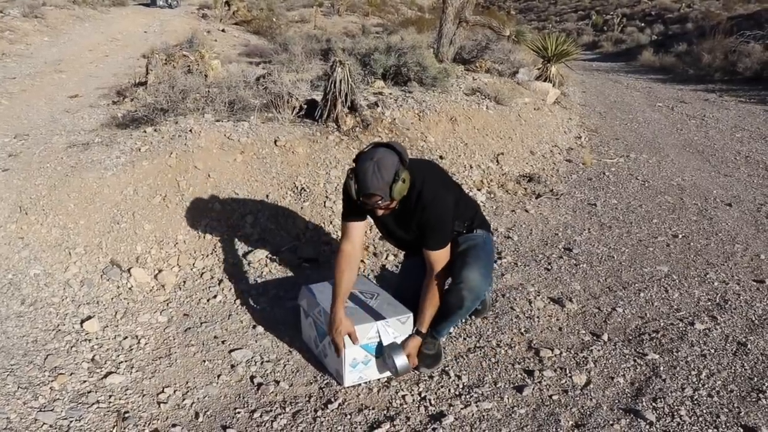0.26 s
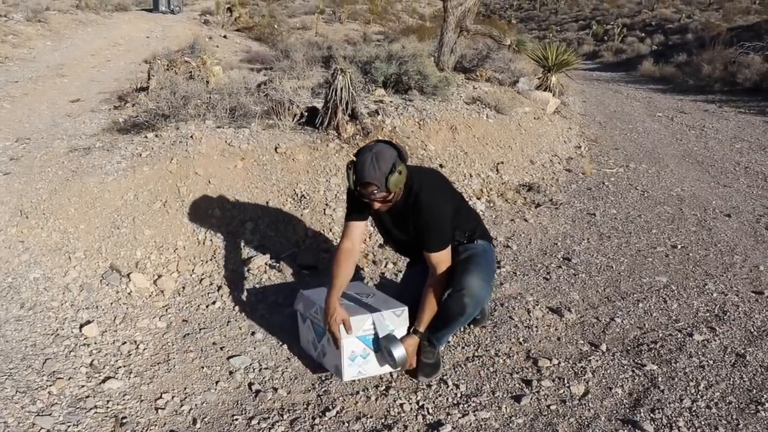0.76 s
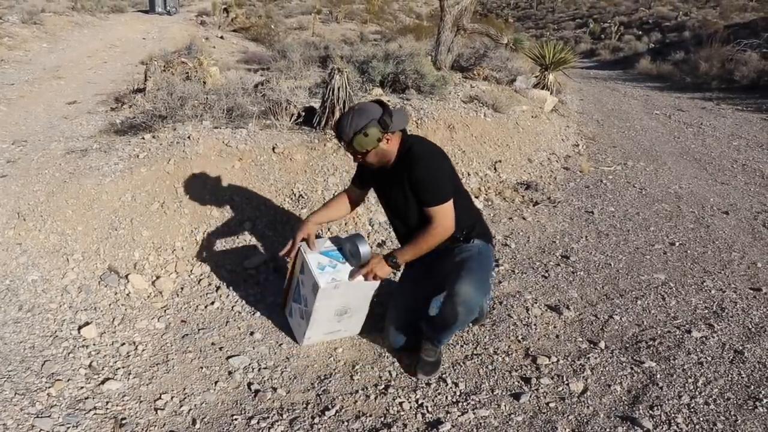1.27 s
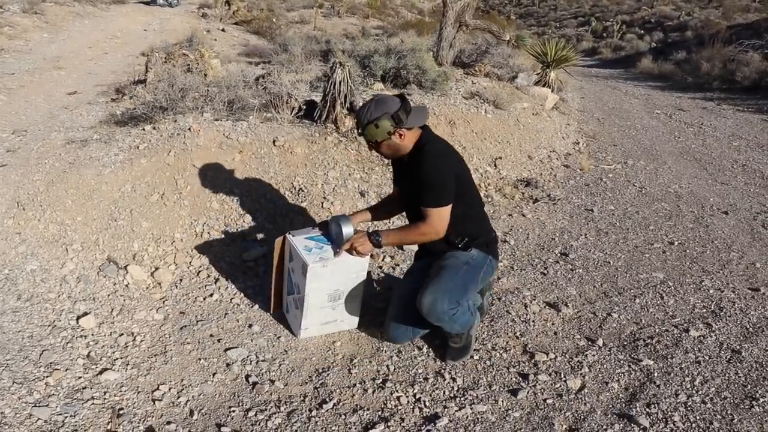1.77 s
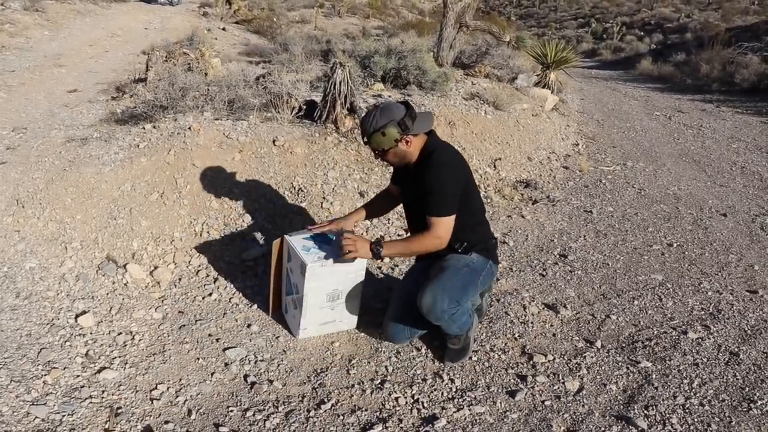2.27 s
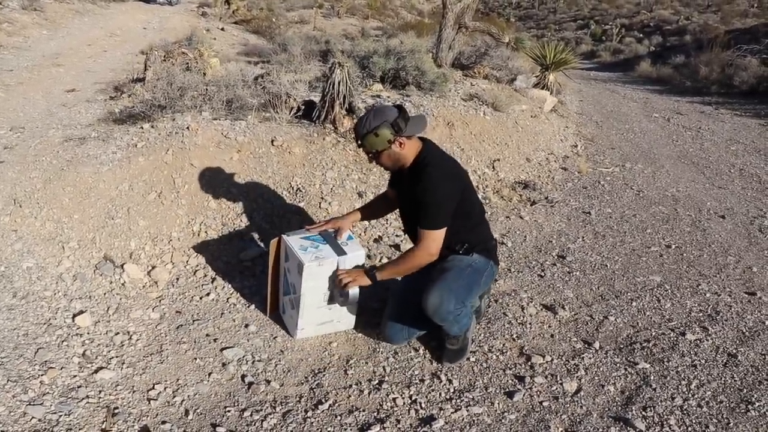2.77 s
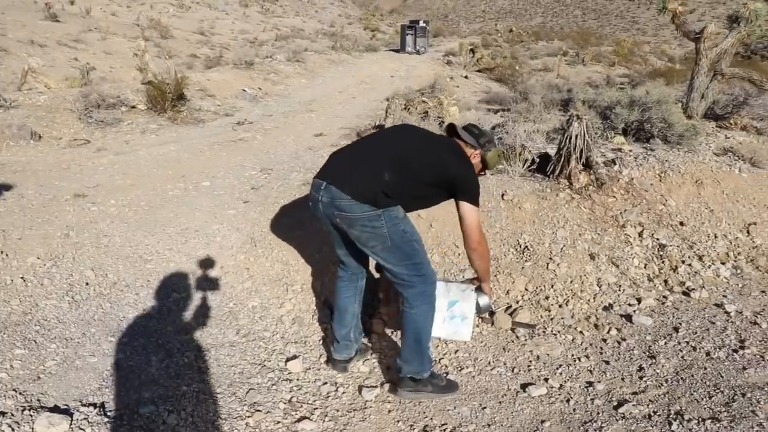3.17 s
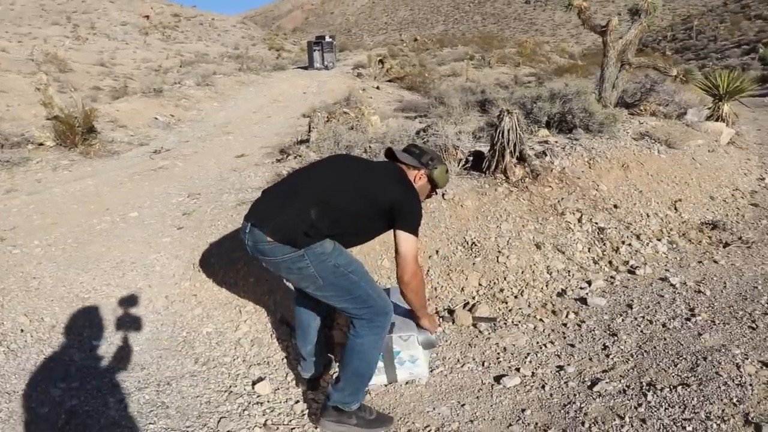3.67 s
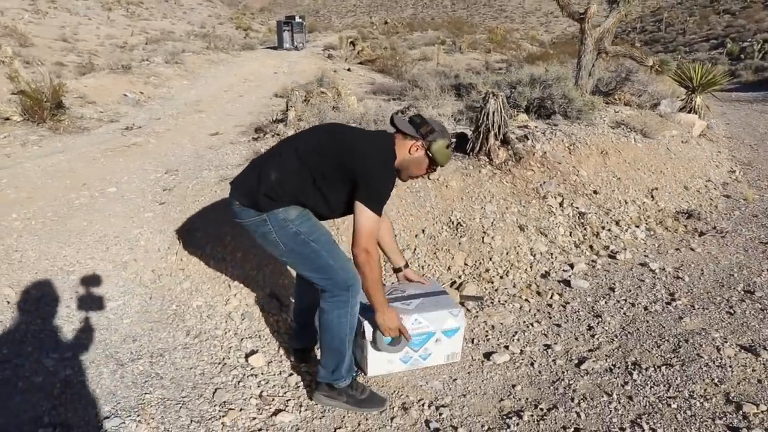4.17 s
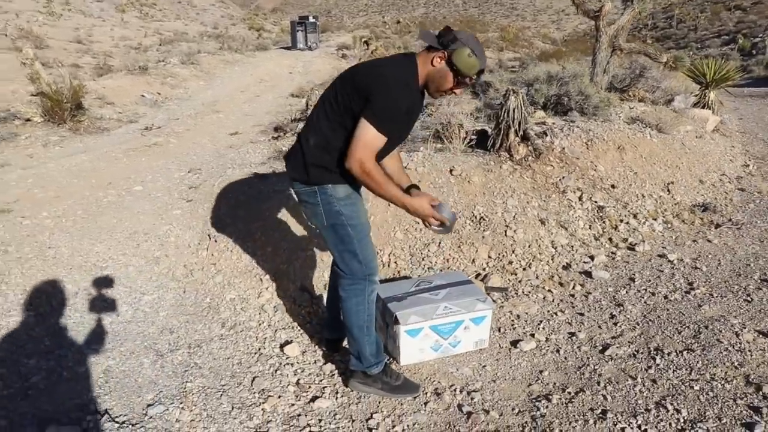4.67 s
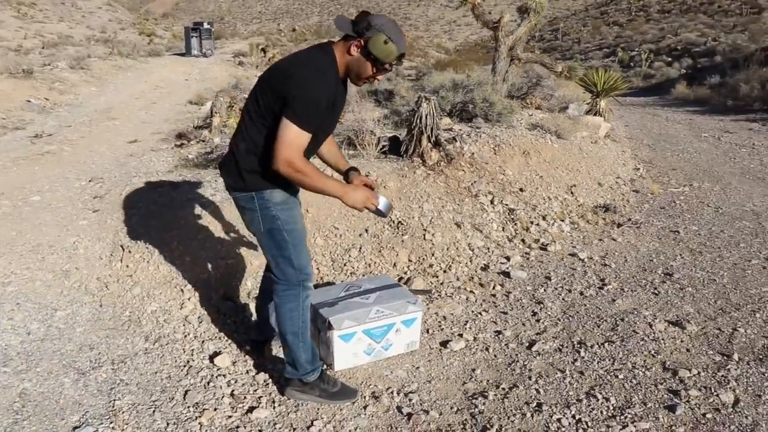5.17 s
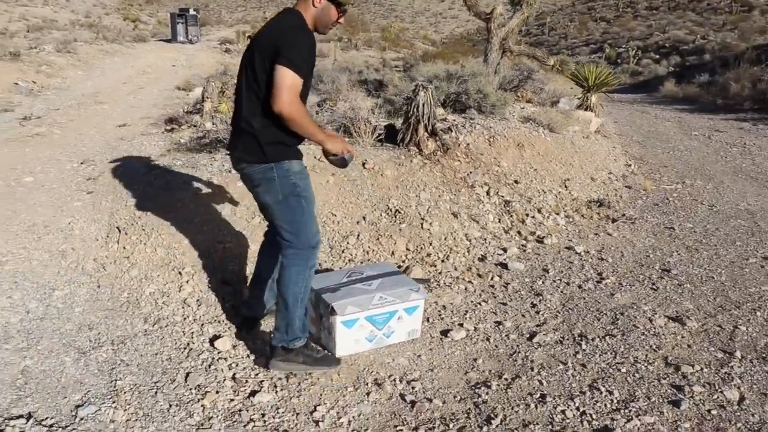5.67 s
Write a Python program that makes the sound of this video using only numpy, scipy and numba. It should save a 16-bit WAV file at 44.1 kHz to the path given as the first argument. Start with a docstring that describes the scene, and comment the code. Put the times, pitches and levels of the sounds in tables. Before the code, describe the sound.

Outdoors on open gravel, a camera microphone a few metres away catches low wind rumble and thumps over faint hiss and small cracks. Packing tape then tears off its roll in short, rasping rips against a cardboard box. The box and boots grind loudly over stones, then things quieten to scattered clicks and light crunches. Dry, mono, no echo.

```python
"""A cardboard box is wrapped in duct tape on desert gravel, a few metres from a mono camera microphone.
Rumbling gusts and thumps on the microphone open it, over air hiss, cracks and grinding grit that run on
throughout; a soft airy hiss swells briefly near 0.6 s. From 1.4 to 3.5 s tape peels off the roll in five
stick-slip rips, clicks ringing the taut tape, roll and box. Around 3.3 to 4.2 s the box and boots grind
hardest, as showers of ringing grains; then the ground quietens, with damped-sine cracks to the end."""
import sys
import numpy as np
from scipy import signal
from scipy.fft import rfft, irfft
from scipy.io import wavfile
from scipy.ndimage import uniform_filter1d
from numba import njit

SR = 44100
rng = np.random.default_rng(int(sys.argv[2]) if len(sys.argv) > 2 else 0)


def materialize(psi):
    """Save the field psi as 16-bit PCM at rate SR to the path in sys.argv[1].

    A 1-D psi becomes a single channel; in a 2-D psi each row is a channel.
    """
    bounded = np.clip(np.atleast_2d(psi).T, -1, 1)
    quanta = np.round(bounded * 32767).astype(np.int16)
    wavfile.write(sys.argv[1], SR, quanta)


N = 261072  # length in samples


def undb(db):
    """Amplitude factor of a level in dB."""
    return 10 ** (np.asarray(db) / 20)


def unit(x):
    """Scale to an RMS of 1."""
    return x / np.sqrt(np.mean(x ** 2))


def noise(n=N):
    """White noise."""
    return rng.standard_normal(n)


def curves(table):
    """Columns of a table after its time column, interpolated to one value a sample."""
    s, *columns = np.transpose(table)
    return [np.interp(np.arange(N) / SR, s, c) for c in columns]


@njit
def svf(x, hz, width):
    """State-variable band-pass, gain 1 at a centre that may move."""
    y, b, l = np.empty(len(x)), 0., 0.
    for i in range(len(x)):
        g, k = np.tan(np.pi * hz[i] / SR), width / hz[i]
        v = (b + g * (x[i] - l)) / (1 + g * (g + k))
        b, l, y[i] = 2 * v - b, l + 2 * g * v, k * v
    return y


def band(x, hz, width):
    """Band-pass with a fixed centre and width in Hz."""
    return svf(x, np.full(len(x), 1. * hz), 1. * width)


def high(x, hz):
    """Third-order high-pass."""
    return signal.sosfilt(signal.butter(3, hz, "high", fs=SR, output="sos"), x)


@njit
def rings(n, at, hz, t60, size):
    """Damped sines, each started at its own moment and stopped 60 dB down."""
    y = np.zeros(n)
    for e in range(len(at)):
        turn = np.exp(2j * np.pi * hz[e] / SR - np.log(1000) / (t60[e] * SR))
        z = size[e] + 0j
        for i in range(int(at[e] * SR), min(n, int((at[e] + t60[e]) * SR))):
            y[i] += z.imag
            z *= turn
    return y


def walk(rate):
    """Random levels held 1 / rate s and slewed twice; spread 1."""
    k = int(SR / rate)
    steps = np.repeat(noise(N // k + 1), k)
    return unit(uniform_filter1d(uniform_filter1d(steps, k), k)[:N])


@njit
def slips(rate, uneven, chance):
    """The glue holds, then lets go: one click a cycle, each cycle with its own length and size."""
    y, phase, k = np.zeros(len(rate)), 1., 0
    for i in range(len(rate)):
        phase += rate[i] * np.exp(2 * uneven[i] ** 2 * chance[k, 0]) / SR
        if phase >= 1:
            phase, k = phase - 1, k + 1
            y[i] = np.exp(uneven[i] * chance[k, 1]) * np.sqrt(SR / rate[i])
    return y


def rips():
    """Slips ring the taut tape, the roll and the box; each slip tears for about a millisecond."""
    # tape pulled off the roll, one row a rip: (glue hiss over the roll at the start [dB],
    # box over the roll at the start [dB], unevenness at the start [0-1], course of the pull:
    # (time [s], taut tape level [dB], roll level [dB], taut tape pitch [Hz], typical slip rate [1/s]))
    pulls = [ (-8.5, -11, 0.44, [(1.388, -36, -40, 955, 700), (1.404, -24, -31.5, 870, 960),
             (1.45, -30.5, -30.5, 900, 900), (1.47, -30, -31, 780, 740), (1.514, -32, -33.5, 790, 740),
             (1.555, -52, -48, 960, 760)]), (-23, -17, .13, [(2.087, -11.5, -17.5, 720, 119),
             (2.1, -8, -23.5, 727, 141), (2.122, -14, -26.5, 704, 120), (2.135, -13, -23, 705, 242),
             (2.155, -15.5, -29.5, 680, 278), (2.18, -16.5, -29, 642, 290), (2.215, -21, -26, 640, 245),
             (2.25, -22.5, -25.5, 587, 200), (2.27, -38, -62, 570, 180)]),
             (-14.5, -7.5, 0.35, [(2.419, -20.5, -27, 660, 760), (2.435, -17, -18, 615, 727),
             (2.488, -20, -22.5, 830, 670), (2.5, -28, -30, 780, 690), (2.514, -23.5, -21, 815, 640),
             (2.554, -26.5, -46, 820, 410), (2.56, -47, -57, 775, 590)]),
             (-17, -14.5, .5, [(2.654, -5.5, -3.5, 2330, 1480), (2.66, -15.5, -24.5, 2270, 1330),
             (2.676, -29, -20, 2320, 1400), (2.682, -56, -78, 2400, 1250)]),
             (-15.5, -12, .4, [(3.412, -33, -27, 636, 635), (3.452, -14.5, -18.5, 680, 660),
             (3.482, -30.5, -39, 675, 570)]), ]
    # resonances of the roll: (centre [Hz], width [Hz], drive [dB])
    roll_modes = [(1410, 570, 28), (2140, 260, 21.5), (2980, 540, 18), (3550, 270, 8), (5500, 620, 3)]
    # the box wall hums after a tug: (time [s], level [dB], pitch [Hz], t60 [s])
    hums = [(2.583, -34, 354, .15), (2.675, -24, 387, 0.11)]
    # as a rip goes on the glue hisses very slightly more over the roll and lets go less evenly,
    # and the box takes more of the shaking
    hiss_rise_db, uneven_rise, box_rise_db = 0.5, .12, 10.5
    out = np.zeros(N)
    for hiss_db, box_db, uneven, course in pulls:
        a, b = int(course[0][0] * SR), int(course[-1][0] * SR)
        taut_db, roll_db, hz, rate = (c[a:b] for c in curves(course))
        done = np.linspace(0, 1, b - a)
        chance = np.clip(rng.standard_normal((2000, 2)), -2, 2)
        clicks = slips(rate, np.clip(uneven + uneven_rise * done, 0, 1), chance)
        tear = signal.lfilter([1], [1, -.97], clicks) * noise(b - a)
        taut = svf(svf(svf(clicks, 0.89 * hz, 115.0), 1.242 * hz, 160.0), hz, 670.0)
        roll = sum(undb(d) * band(clicks + 0.45 * tear, f, w) for f, w, d in roll_modes)
        roll = band(roll, 2300, 1950)
        box = band(band(0.039 * tear + clicks, 207, 215), 310, 350)
        hiss = band(high(tear, 4300), 7300, 16000)
        shaken = undb(hiss_db + hiss_rise_db * done) * unit(hiss)
        shaken += undb(box_db + box_rise_db * done) * unit(box)
        out[a:b] += undb(taut_db) * unit(taut) + undb(roll_db) * (unit(roll) + shaken)
    at, db, hz, t60 = np.transpose(hums)
    return out + rings(N, at, hz, t60, undb(db))


def cracks(count=8):
    """A ring at the crack's own pitch, a spray of short snaps and ticks, and a thud in the box."""
    # single cracks of tape, card and stones, levels ahead of the high-pass: (time [s], ring level [dB],
    # ring pitch [Hz], ring t60 [s], first snaps over the ring [dB], middle snap pitch [Hz])
    events = [(.041, -33, 720, .03, 2.5, 3230), (.114, -23.5, 660, 0.017, -1.5, 2150),
              (.151, -3, 637, 0.019, -2, 2000), (.362, -25, 1194, 0.06, 8.5, 2700),
              (.376, -18.5, 2470, .024, 3, 2450), (0.392, -29, 895, 0.011, -1, 3000),
              (.444, -27, 1120, 0.033, 12, 1950), (.529, -7, 500, 0.013, -23, 1540),
              (.58, -23.5, 1030, .0075, -1.5, 4350), (.717, -31, 463, 0.0082, 3.5, 1500),
              (.767, -36, 403, 0.0099, 1.5, 1620), (.876, -6, 2390, 0.0094, -5.5, 2930),
              (.945, -31.5, 674, .0078, 8.5, 2930), (.981, -43, 1410, .018, 7, 2920),
              (1.004, -31.5, 1430, 0.028, 2.5, 4550), (1.027, -25, 1620, 0.018, 2.5, 1730),
              (1.054, -37.5, 2700, .01, 5.5, 4500), (1.074, -32, 2720, .02, 6, 2960),
              (1.123, -38, 1520, .013, 0, 5100), (1.166, -13, 877, 0.023, 3.5, 2050),
              (1.175, -19, 2680, .0073, 1.5, 2880), (1.197, -35, 745, .0085, 6, 5000),
              (1.232, -29, 2000, 0.012, -2, 3000), (1.268, -32, 1500, 0.011, 3.5, 3800),
              (1.379, -9, 786, 0.014, -1.5, 2600), (1.563, -7, 773, 0.016, -7.5, 2100),
              (1.72, -45, 3030, 0.0079, 4, 6170), (1.773, -13, 1600, 0.0037, -23, 2500),
              (1.91, -27, 2190, 0.01, -10, 2190), (1.92, -35, 654, 0.0077, 11, 2240),
              (1.955, -17.5, 1580, 0.0058, -17, 1532), (2.05, -28, 905, 0.032, 1, 1620),
              (2.075, -23.5, 810, 0.055, 10, 2610), (2.274, -20, 570, 0.017, 9, 2080),
              (2.318, -30, 2920, 0.016, 6.5, 3200), (2.357, -36, 2500, .01, -10, 4070),
              (2.429, -25, 617, .0079, 10, 2090), (2.466, -10, 1030, 0.036, -1, 2110),
              (2.532, -14.5, 764, 0.016, -11, 2416), (2.58, -37, 403, .02, -2, 4000),
              (2.621, -26.5, 646, 0.012, -3, 1520), (2.65, -7, 2070, 0.0055, -5.5, 2140),
              (2.666, -8, 894, 0.031, -1, 1890), (2.773, -40, 3040, .01, 3, 4940),
              (2.917, -20, 424, .03, -0.5, 2840), (3.001, -20.5, 3530, 0.023, 8.5, 3800),
              (3.023, -22, 1100, 0.054, -16, 1630), (3.064, -3.5, 800, 0.01, -26, 3300),
              (3.096, -5.5, 564, 0.0091, -28, 1580), (3.16, -18.5, 396, 0.013, -1, 2280),
              (3.253, -13, 590, 0.014, -14, 1550), (3.323, -4, 510, 0.011, -15, 1680),
              (3.337, -7, 423, 0.0034, 2.5, 2210), (3.34, 0, 437, 0.014, -28, 2620),
              (3.376, -6.5, 4280, 0.0047, -10.5, 4120), (3.392, -9.5, 470, 0.015, 3.5, 1700),
              (3.507, -30, 2020, .01, 4, 5200), (3.521, -32, 2030, .01, 8, 5700),
              (3.54, -34, 2500, 0.0092, 6, 5570), (3.561, -24.5, 3100, 0.014, 0, 2940),
              (3.626, -12, 1080, 0.014, -27, 1810), (3.659, -16, 725, 0.023, -2, 1970),
              (3.693, -25, 1000, 0.015, -3, 5100), (3.726, -16, 810, 0.02, -2.5, 2250),
              (3.752, -15.5, 1110, 0.027, -15, 1500), (3.785, -12, 794, 0.026, -5, 2360),
              (3.809, -16, 2120, 0.029, -4, 2000), (3.871, -5.5, 580, 0.014, -21, 2290),
              (3.892, -1, 1080, 0.009, -14, 1570), (3.914, -14.5, 1190, .024, 2, 1760),
              (3.924, -14.5, 625, .015, 2.5, 2290), (3.955, -18, 2790, 0.021, -10, 2760),
              (3.994, -12.5, 1220, 0.03, -18, 2550), (4.046, -13, 543, 0.021, -15, 2000),
              (4.087, -15.5, 483, 0.015, 0.5, 2190), (4.133, -12.5, 556, 0.016, -9, 1500),
              (4.152, -15.5, 1180, .023, 3, 4230), (4.197, -10, 1040, 0.0091, -9, 3520),
              (4.243, -25.5, 420, 0.048, -4, 3230), (4.281, -30.5, 1090, 0.033, 4, 2500),
              (4.349, -28, 535, 0.019, 2.5, 2380), (4.432, -34, 1150, .015, -3, 2500),
              (4.467, -22.5, 1110, .022, -33, 2090), (4.546, -33.5, 1080, 0.022, -13, 1530),
              (4.618, -42.5, 634, 0.012, 1, 5000), (4.904, -24, 910, .015, -20, 1500),
              (4.909, -26, 660, .035, -35, 1680), (4.961, -27, 826, 0.024, -10, 1640),
              (5.004, -16, 1160, .0083, -16, 1500), (5.039, -21, 1270, 0.023, -31, 1500),
              (5.06, -30, 1200, .015, -25, 1500), (5.081, -31, 1080, .02, -21, 1500),
              (5.093, -25.5, 1120, 0.028, -37, 1620), (5.117, -25.5, 1170, 0.021, -31, 1500),
              (5.157, -23, 2600, 0.0085, -7, 1690), (5.224, 2, 880, 0.0091, -33, 1500),
              (5.27, -18, 1240, 0.017, -33, 1550), (5.304, -22, 530, 0.011, -15, 1500),
              (5.658, -15.5, 2410, 0.0037, -19, 5270), (5.663, -9.5, 900, 0.0054, -14, 1710),
              (5.674, -21, 900, 0.01, -12, 2000), (5.697, -16.5, 2420, .0086, -32, 2420),
              (5.715, -29, 547, 0.0081, -17, 2500), (5.727, -21.5, 463, .02, -6, 2640),
              (5.743, -36, 1500, 0.011, -10, 5400), (5.772, -40, 1100, .01, -1.5, 5530),
              (5.782, -33, 1110, 0.012, -11, 4820), (5.831, -35.5, 1300, 0.011, 4, 2720),
              (5.848, -28, 1080, .01, -18, 1500), (5.89, -32.5, 740, 0.022, -3, 1540)]
    spray_s, thud_db = .0045, -37.5  # longest delay of a snap; thud over the ring
    tick_db, tick_db_per_octave = -22.5, 12.5  # ticks over 2 kHz snaps; higher snaps tick louder
    at, db, hz, t60, snap_db, snap_hz = np.transpose(events)
    tick_over_ring_db = snap_db + tick_db + tick_db_per_octave * np.log2(snap_hz / 2000)
    same = np.ones(len(at))
    sharp = rings(N, at, hz, np.clip(t60, .002, .2), undb(db))
    u = rng.random((len(at), count, 4)).T
    for k in range(count):
        late = u[0, k] ** 2  # later snaps are weaker
        pitch = snap_hz * 2.1 ** (u[1, k] - .5)
        sharp += rings(N, at + spray_s * late, pitch, 0.0018 * same, undb(db + snap_db - 1.57 * late))
        tick_at = at + 0.69 * spray_s * u[2, k] ** 2
        tick_hz = 5500 * 3.11 ** u[3, k]
        sharp += rings(N, tick_at, tick_hz, 0.0024 * same, undb(db + tick_over_ring_db))
    thuds = rings(N, at, 170 * same, 0.03 * same, undb(db + thud_db))
    return high(sharp, 414) + high(thuds, 56)


def moves():
    """Levels of box walls, scrape, pebbles and grit, and where the scrape rings."""
    # box, hands and boots on gravel, one row a movement: (box walls over the scrape [dB],
    # grit over the usual pebbles [dB], scrape pitch [Hz],
    # course: (time [s], scrape level [dB], pebble level [dB]))
    movements = [ (-15, -10.5, 900, [(0.0, -44.5, -39.5), (0.136, -47.5, -44.5), (0.296, -47.5, -50.5),
                 (0.424, -46, -47), (0.696, -49.5, -49.5), (0.868, -53, -55), (0.99, -50.5, -45.5)]),
                 (-24, -12, 880, [(1.0, -54.5, -53.5), (1.204, -45, -42.5), (1.38, -38, -36)]),
                 (-15, -7.5, 950, [(1.575, -37.5, -41), (1.753, -51.5, -47), (1.769, -36.5, -40),
                 (1.887, -52, -49), (1.921, -45, -60), (1.931, -66, -49), (1.951, -44, -50),
                 (2.005, -50, -53), (2.07, -41, -41)]), (-3.5, -17, 1050, [(2.28, -31, -43),
                 (2.298, -49, -50), (2.402, -88, -59), (2.415, -70, -46)]),
                 (-4, -52, 820, [(2.565, -40, -69), (2.639, -60, -77), (2.645, -26.5, -66)]),
                 (-6, -21, 1130, [(2.69, -39.5, -51), (2.76, -68, -59), (2.81, -75, -63), (2.894, -47, -43),
                 (2.9, -57, -69)]), (-6.5, -13.5, 785, [(2.905, -55.5, -52), (2.915, -31, -31.5),
                 (2.987, -38.5, -38), (3.009, -28, -33.5), (3.055, -35, -34), (3.061, -25.5, -31.5),
                 (3.199, -34, -36), (3.249, -26, -33), (3.273, -32.5, -38.5), (3.347, -12, -23.5),
                 (3.359, -31.5, -29.5), (3.41, -22, -31)]), (-4, -15, 754, [(3.49, -35.5, -38.5),
                 (3.766, -27.5, -34.5), (3.796, -24, -22), (3.83, -28, -29), (3.894, -18, -24),
                 (3.904, -32, -32), (3.916, -21, -29), (3.946, -28.5, -29.5), (3.996, -18, -20.5),
                 (4.004, -21.5, -27.5), (4.074, -25, -28.5), (4.142, -33.5, -41), (4.152, -28.5, -39),
                 (4.186, -34, -38), (4.2, -31.5, -33.5)]), (-9, -11.5, 1040, [(4.21, -33, -39),
                 (4.234, -37.5, -39), (4.476, -42, -61), (4.556, -48, -63), (4.62, -51, -46.5),
                 (4.634, -66, -58), (4.768, -53, -57.5), (4.88, -69, -68)]),
                 (-12.5, -33, 1100, [(4.9, -74, -84)] + [(4.904, -26, -54), (4.91, -27.5, -44),
                 (4.932, -44.5, -80), (5.008, -33.5, -45.5), (5.032, -42, -69), (5.038, -37.5, -62),
                 (5.076, -48, -76), (5.092, -43, -71), (5.15, -49.5, -73)] + [(5.2, -49, -68)]),
                 (-14, -24, 990, [(5.222, -37.5, -73)] + [(5.23, -25, -44), (5.234, -33, -61),
                 (5.252, -41, -50), (5.274, -35, -59), (5.378, -59.5, -60), (5.5, -49.5, -59)]),
                 (-11, -19.5, 740, [(5.51, -54, -55), (5.558, -36.5, -40.5), (5.614, -40.5, -46),
                 (5.66, -29, -37.5), (5.738, -43.5, -36.5), (5.756, -47.5, -60), (5.838, -54, -51),
                 (5.848, -48, -55), (5.876, -67, -66), (5.892, -37.5, -49), (5.92, -67, -56)]), ]
    # grit swells by this share of the pebbles' swell about their usual level
    grit_follows, usual_db = 0.95, -38
    rows = []
    for box_db, grit_db, hz, course in movements:
        for s, scrape_db, pebbles_db in course:
            grit = usual_db + grit_db + grit_follows * (pebbles_db - usual_db)
            rows.append((s, scrape_db + box_db, scrape_db, pebbles_db, grit, hz))
    return curves(rows)


def grind(scatter_db=3.5, top_db=16, clump_db=1.0, rub_db=-12, light_db=-62, heavy_db=-30):
    """Each grain knocks the box, scrapes, rings a pebble and spits grit, in clumps, over a steady rub."""
    grains_per_s = 2500  # grains available; a light touch leaves many of them still
    count = int(grains_per_s * N / SR)
    u, g = rng.random((count, 3)).T, rng.standard_normal((count, 8)).T
    at, clump = u[0] * N / SR, undb(clump_db * walk(70))
    sample = (at * SR).astype(int)
    *levels, scrape_hz = moves()
    # a light touch moves few grains, so each stands out
    share = np.clip((levels[1][sample] - light_db) / (heavy_db - light_db), .12, 1)
    size = undb(np.minimum(-scatter_db * np.log(1 - u[1]), top_db))
    size = size * (u[2] < share) / np.sqrt(share)
    # box, scrape, pebbles, grit: (centre [Hz], log pitch spread, cycles rung [count], size scatter [dB]);
    # scrape grains take their centre from the movement
    layers = [(339.6, 0.19, 9, 0.91), (1015, 0.46, 5.7, 3.6), (2555, 0.42, 20.0, 3.4), (10600, 1.0, 1.0, 5.0)]
    out = 0
    for k, ((hz, spread, cycles, own_db), db) in enumerate(zip(layers, levels)):
        centre = scrape_hz[sample] if k == 1 else hz
        f = np.clip(centre * np.exp(spread * g[k]), 150, 16000)
        grains = unit(rings(N, at, f, cycles / f, size * undb(own_db * g[4 + k])))
        rub = undb(rub_db) * unit(band(noise(), hz, hz))
        layer = clump * band(high(grains + rub, 0.28 * hz), hz, 1.3 * hz)
        out = out + undb(db) * unit(layer)
    return out


def thumps():
    """Each a few slow swings, softened by broad band-passes, with a shorter, higher knock on top."""
    # low thumps of air on the microphone and of the box on the ground, levels ahead of the band-passes:
    # (time [s], level [dB], pitch [Hz], knock over the thump [dB])
    events = [(0.078, -9.5, 85, -6), (0.121, -12, 128, -0.5), (0.184, -13.5, 75.4, -6.5),
              (0.204, -15, 80.7, -13), (0.229, -11.5, 112, -21), (0.279, -29, 64.6, -10),
              (0.323, -13, 56.5, -11), (0.378, -7.5, 91.5, -12), (0.393, -8, 65.4, -4.5),
              (0.439, -19, 57, -6), (0.499, -1, 95, -2), (0.526, -2, 56.5, -0.5), (0.618, -10, 115, -13),
              (0.639, -16, 56.5, -12), (0.67, -27, 102, -13), (0.718, -7, 60, -7.5),
              (0.786, -11.5, 56.5, -12), (0.809, -30, 94.2, -12), (0.874, -12.5, 66, -10.5),
              (0.946, -16.5, 121, -7), (0.959, -14, 101, -19), (1.159, -18.5, 56.5, -12),
              (1.208, -25, 88, -3), (1.239, -16, 130, -3.5), (1.269, -25, 56.5, -6), (1.318, -16, 111, -10),
              (1.359, -24, 67.3, -7), (2.65, -17.5, 114.6, 7), (3.334, -8.5, 118, 3),
              (3.807, -23.5, 108, -9), (3.994, -25, 109, -4)]
    thump_cycles, knock_hz, knock_t60_s = 4.5, 194, 0.029
    at, db, hz, knock_db = np.transpose(events)
    pitch = knock_hz * 1.18 ** (rng.random(len(at)) - .5)
    knocks = rings(N, at + 0.00359, pitch, np.full(len(at), knock_t60_s), undb(db + knock_db))
    swings = rings(N, at, hz, thump_cycles / hz, undb(db))
    return band(band(swings, 132, 250), 107, 540) + band(knocks, knock_hz, 350)


def wind():
    """Eddies over the microphone: a deep rumble and a faster flutter, both throbbing, over a faint drone."""
    # gusts, levels ahead of the throb: (time [s], rumble level [dB], flutter level [dB], drone level [dB])
    gusts = [(0, -31, -38, -50), (.05, -29.5, -46, -55), (.4, -33, -36, -27), (.6, -25.5, -31.5, -43),
             (.82, -32, -39.5, -32), (.98, -37, -50, -36), (1.09, -60, -71, -51), (1.17, -28, -46, -41),
             (1.34, -34, -36.5, -37), (1.6, -51, -64, -57), (1.7, -66, -62, -56), (2.02, -48, -61, -49),
             (2.34, -56, -51, -58), (2.52, -47, -51, -46), (2.69, -75, -71, -61), (2.94, -54, -65, -48),
             (3.1, -36, -50, -37), (3.23, -49, -43.5, -58), (3.52, -63, -51.5, -68),
             (3.97, -47, -40.5, -63), (4.3, -62, -57, -60), (4.6, -78, -78, -62), (5.0, -76, -73, -60),
             (5.35, -75, -66, -52), (5.55, -74, -63, -64), (5.92, -72, -61, -59)]
    throb_db, drone_throb_db = 4, 3  # spread of the random level swings
    rumble_db, flutter_db, drone_db = curves(gusts)
    throb = throb_db * walk(23)
    rumble = band(band(noise(), 61.0, 48), 40, 45)
    flutter = band(band(noise(), 127, 82), 153, 90)
    drone = band(band(noise(), 29.4, 30), 30, 24)
    out = undb(rumble_db + throb) * unit(rumble)
    out += undb(flutter_db + throb + 0.4 * walk(30.43)) * unit(flutter)
    return out + undb(drone_db + drone_throb_db * walk(2.5)) * unit(drone)


def swell():
    """A soft airy hiss: a band of noise that rises and falls once."""
    # course of the hiss: (time [s], level [dB])
    course = [(.47, -65), (.53, -52.5), (.6, -51), (.67, -80)]
    centre_hz, width_hz = 5340, 1500
    level_db = curves([(0, -120)] + course + [(1, -120)])[0]
    hiss = band(band(noise(), centre_hz, width_hz), centre_hz, width_hz)
    return undb(level_db) * unit(hiss)


def air():
    """Steady hiss of open air and microphone: noise shaped across its spectrum."""
    # shape of the hiss: (frequency [Hz], relative level [dB])
    spectrum = [(88, -43), (150, -3), (578, -1.5), (941, -1.5), (1450, -8), (2020, -5.5), (7180, -18),
                (15100, -16.5), (16000, -17)]
    level_db = -53.5  # RMS of the whole hiss
    f = np.arange(N // 2 + 1) * SR / N + 1  # 1 Hz up, so that the logarithm exists at zero
    hz, db = np.transpose(spectrum)
    shape = undb(np.interp(np.log(f), np.log(hz), db))
    return undb(level_db) * unit(irfft(rfft(noise()) * shape, N))


def scene():
    """All sources summed to mono, the same on both channels."""
    mono = rips() + cracks() + grind() + thumps() + wind() + swell() + air()
    return np.array([mono, mono])


def record(dry):
    """The microphone port lifts a band near 5 kHz; the loudest peaks clip; the top is cut."""
    top_hz = 15900
    heard = np.array([x + undb(-2.5) * band(x, 5250, 1100) for x in dry])
    low_pass = signal.ellip(8, .2, 70, top_hz, fs=SR, output="sos")
    return signal.sosfilt(low_pass, np.clip(heard, -1, 1))


dry = scene()
out = record(dry)
materialize(out)
```